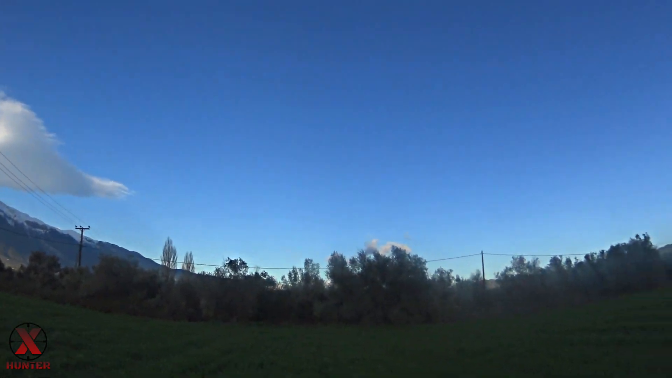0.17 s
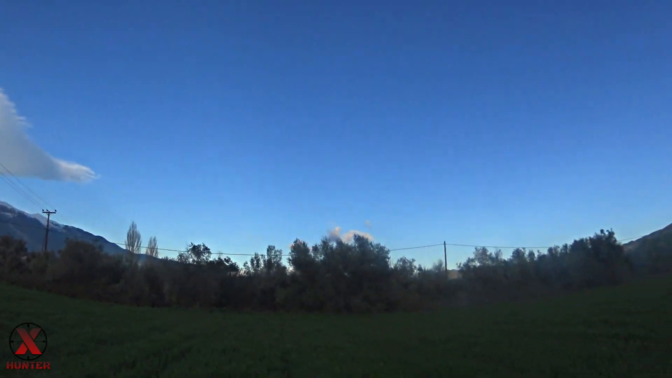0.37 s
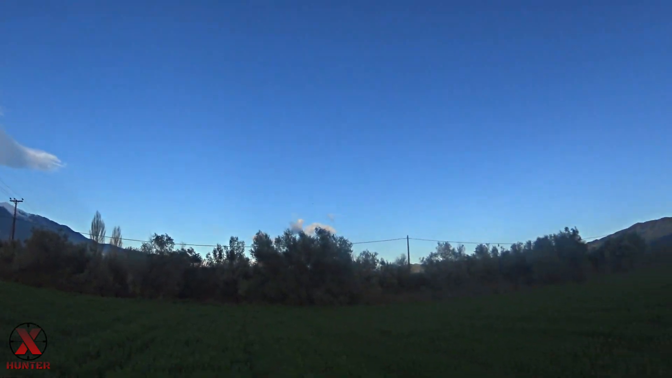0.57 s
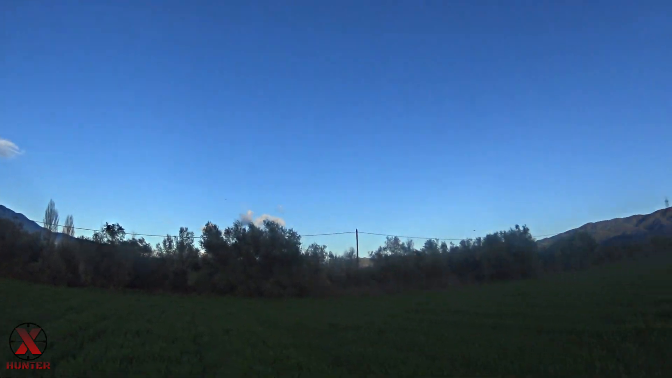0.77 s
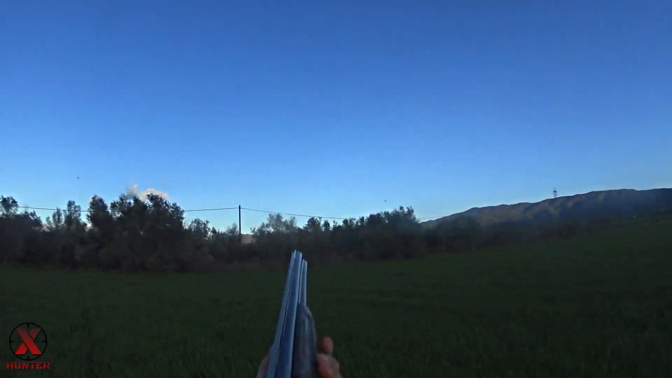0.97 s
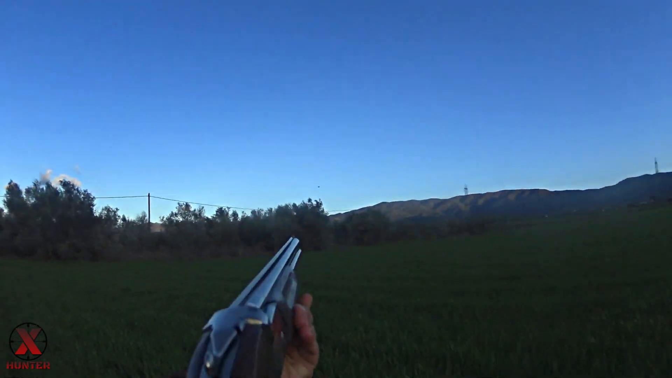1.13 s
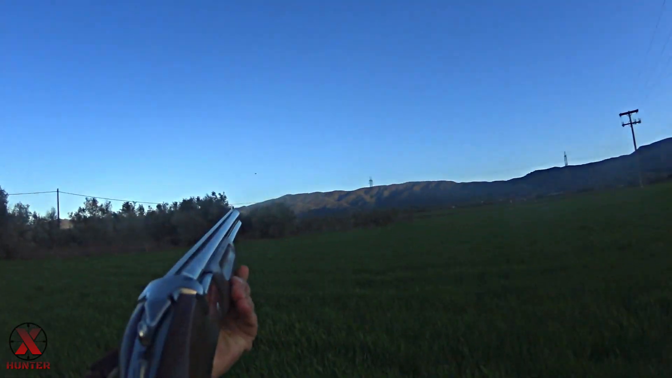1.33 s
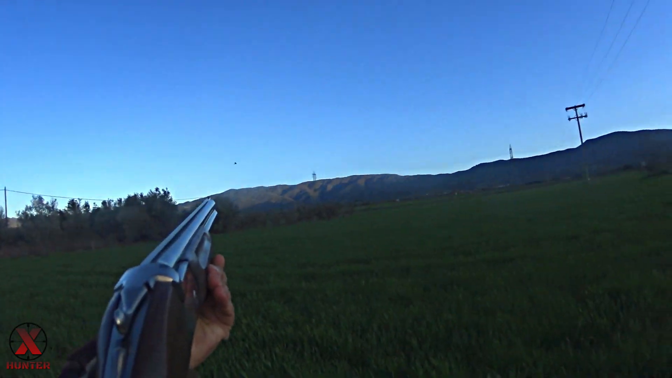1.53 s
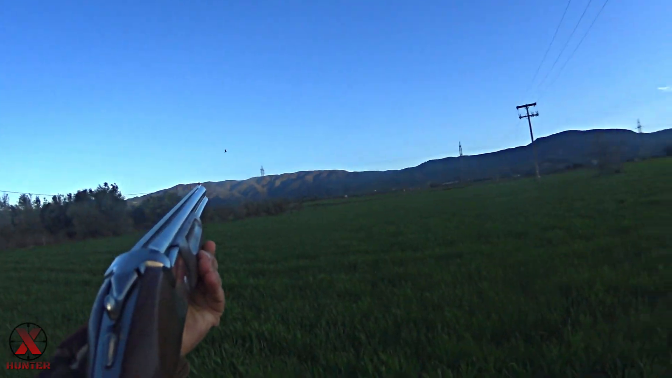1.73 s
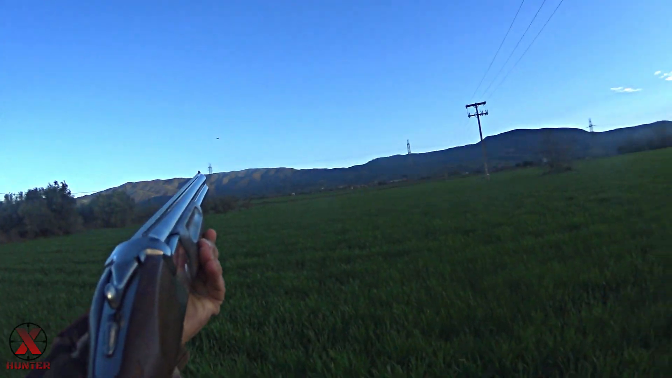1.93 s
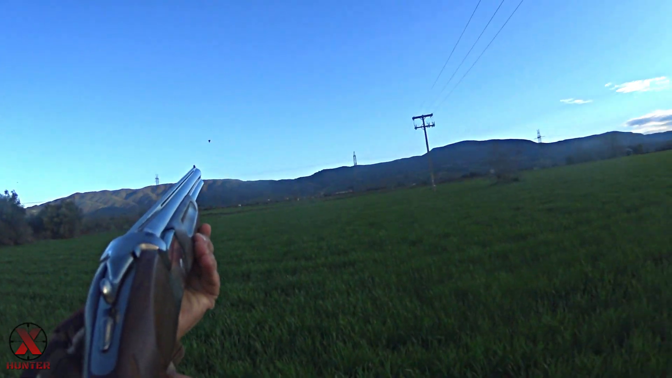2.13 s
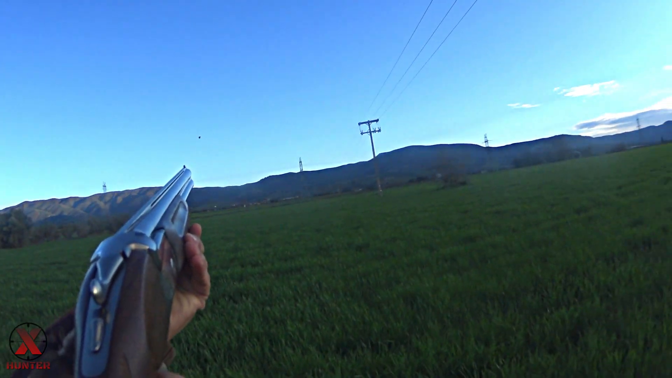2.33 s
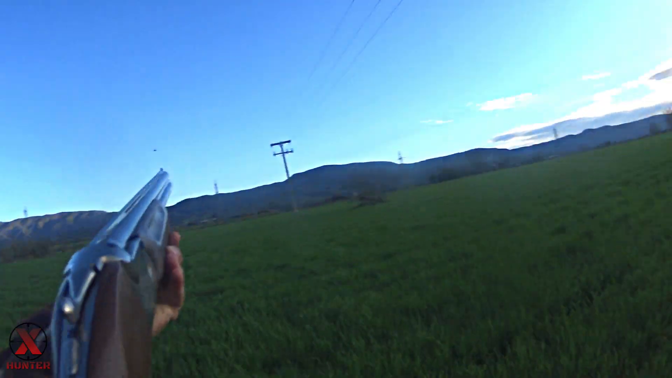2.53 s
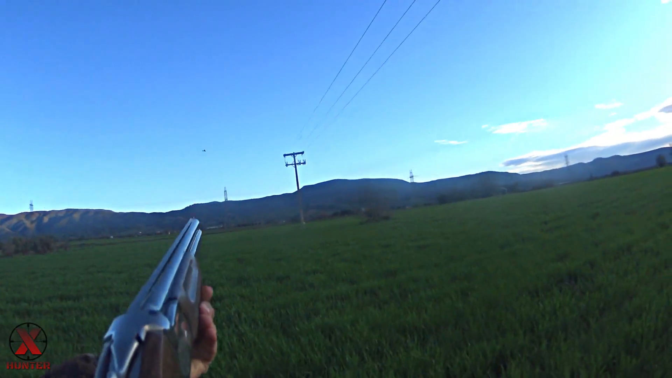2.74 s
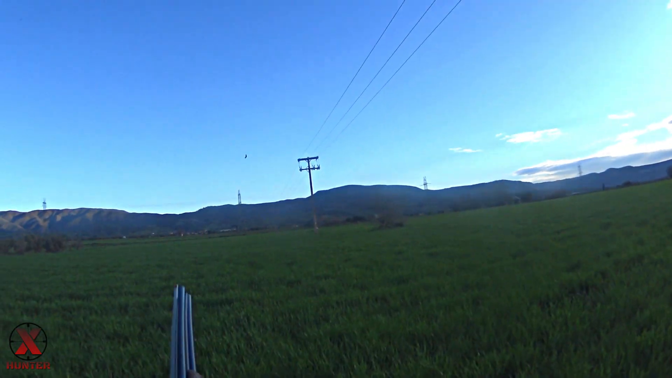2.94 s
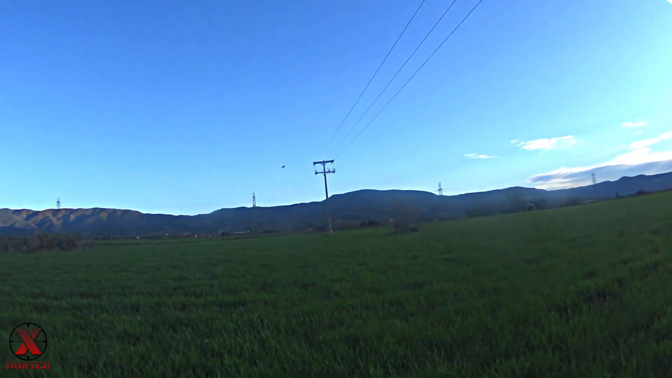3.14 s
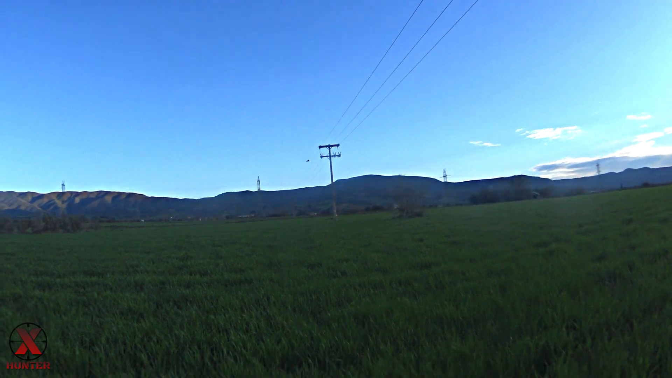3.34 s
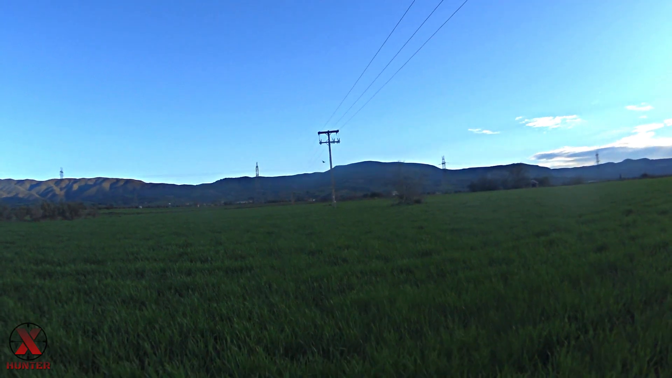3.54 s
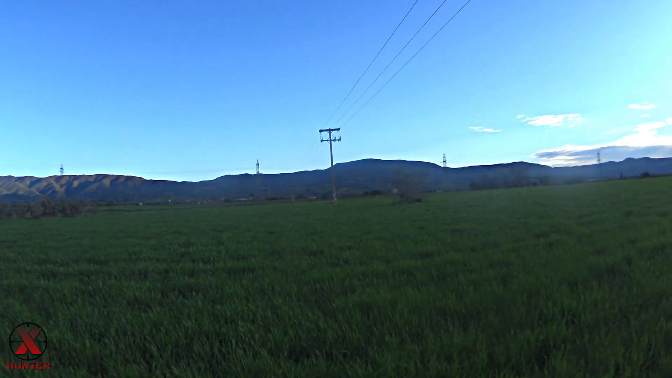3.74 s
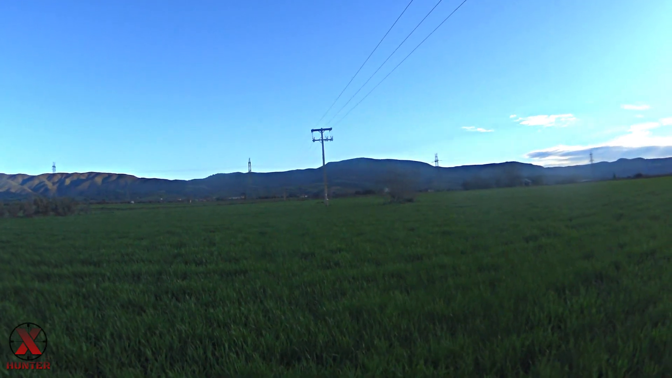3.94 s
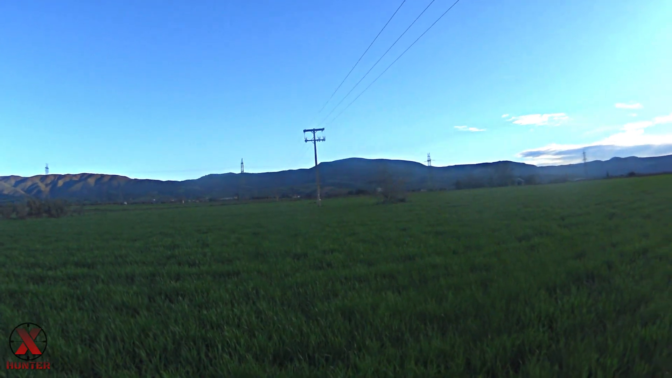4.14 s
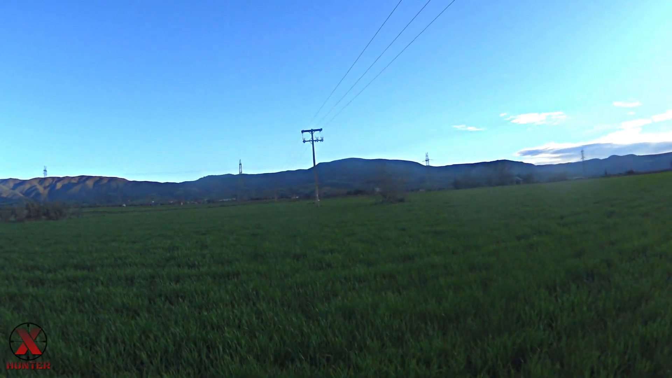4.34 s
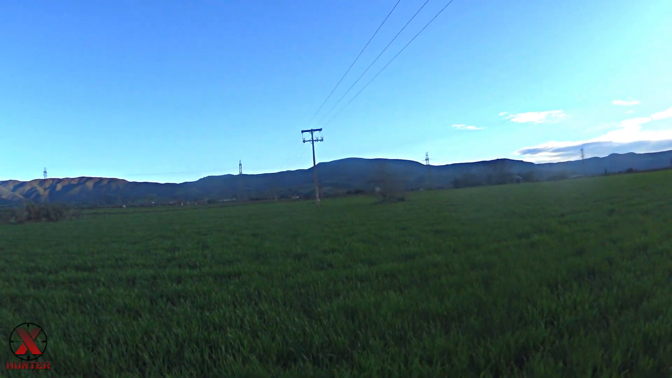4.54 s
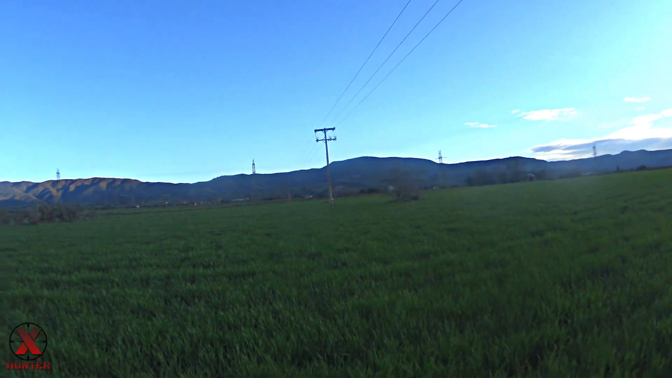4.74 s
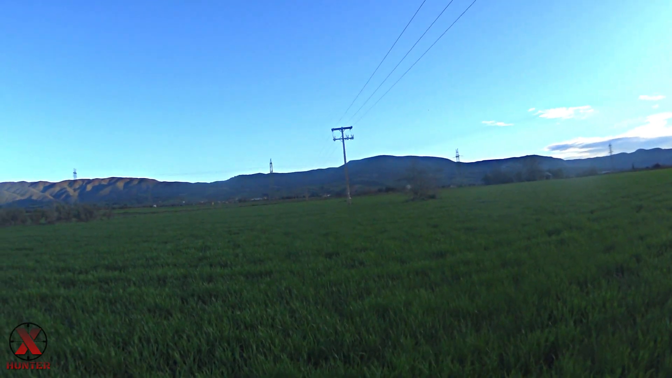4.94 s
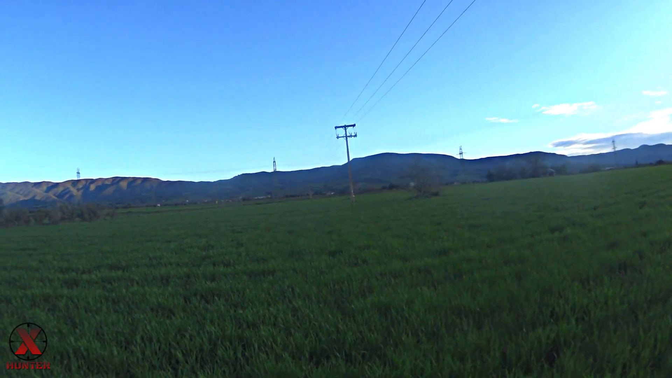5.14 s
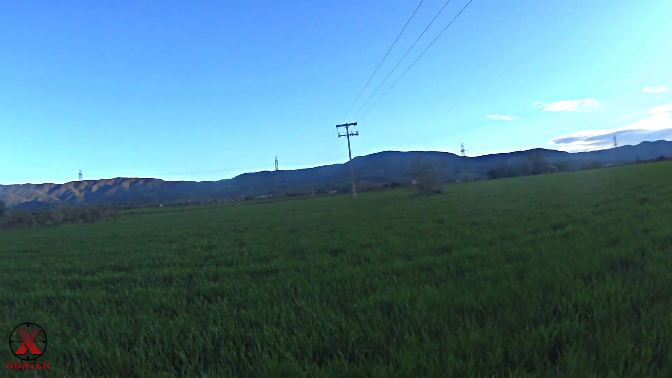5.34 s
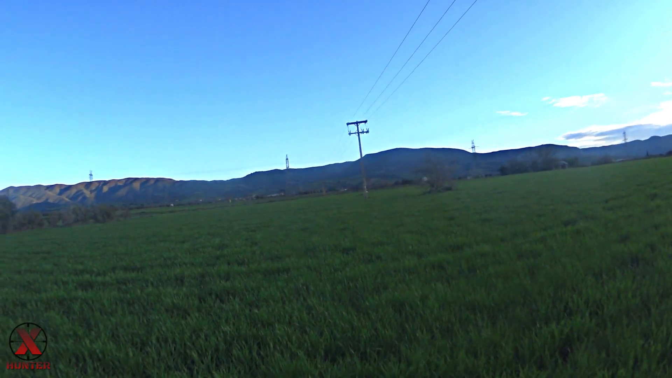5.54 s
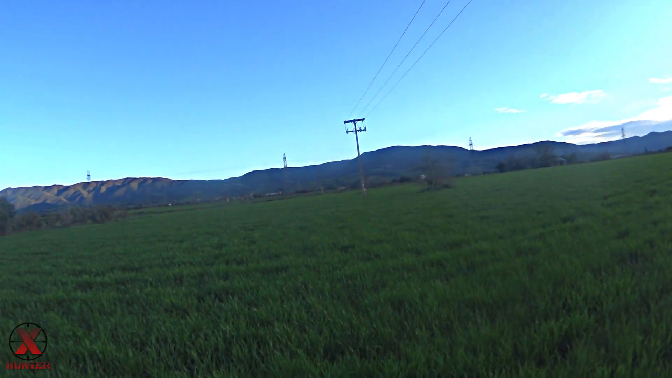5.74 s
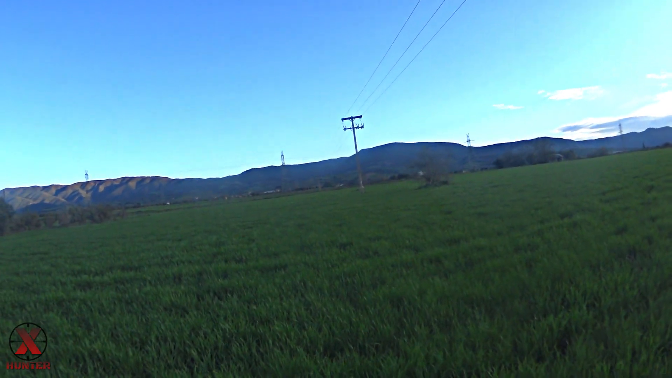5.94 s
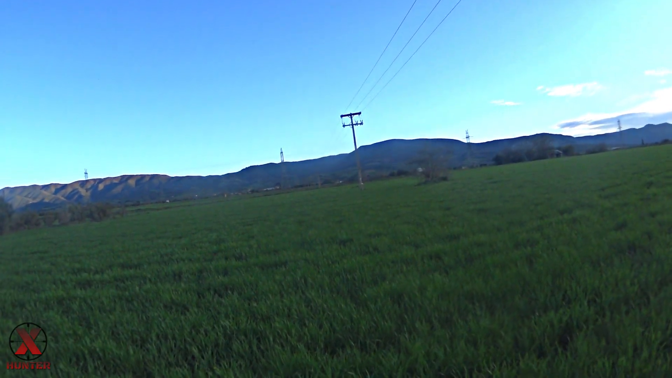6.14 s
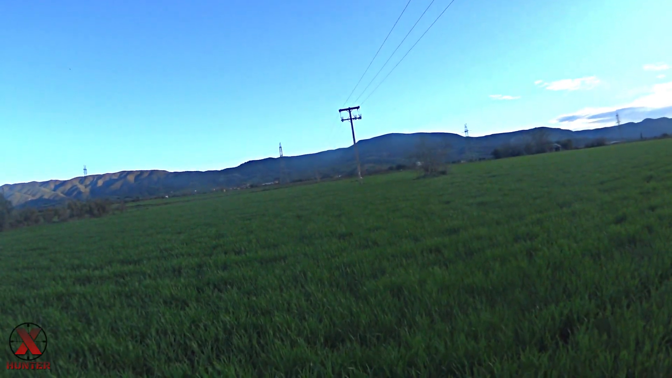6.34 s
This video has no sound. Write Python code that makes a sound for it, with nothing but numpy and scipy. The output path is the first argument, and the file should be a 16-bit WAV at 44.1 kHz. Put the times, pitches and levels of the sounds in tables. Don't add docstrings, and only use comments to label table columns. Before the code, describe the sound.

A body-worn camera in a hard case picks up thin airy wind and soft buffets. After a tick and a sharp stock knock, a single gunshot overloads it: crackling, boxy rattle, held briefly, then a deep downward thump. A snap, two woody-metallic clacks and a faint distant bird whistle follow. Later, strap buckles click rapidly with cloth scuffs, leaving quiet open-air breeze.

```python
import sys
import numpy as np
from scipy import signal
from scipy.fft import rfft, irfft
from scipy.io import wavfile

SR = 44100
rng = np.random.default_rng(int(sys.argv[2]) if len(sys.argv) > 2 else 0)


def makeup_ratio(level_db):
    decades = np.asarray(level_db, float) / 20
    return 10 ** decades


def log_audio(samples):
    frames = np.atleast_2d(samples).T
    limited = np.clip(frames, -1, 1)
    pcm = np.round(limited * 32767).astype(np.int16)
    wavfile.write(sys.argv[1], SR, pcm)


N = 286650
BLAST_S = 2.4225

# [f/Hz, level/dB per Hz]
RATTLE = [(1650, -55), (2800, -8), (4090, -1), (4560, -1), (5290, -2), (5830, 2), (7080, -6.5),
          (9640, -15.5), (11000, -12), (14300, -46), (22000, -120)]
RING = [(210, -57), (350, -11.5), (460, -13.5), (497, -6), (538, -9), (1030, -7.5), (1340, 0.5),
        (2010, -8.5), (2660, 2), (3600, -6.5), (4680, -22), (7920, -120)]
SHAKE = [(10, -23), (32, -6), (60, -10), (130, -11.5), (300, -14), (500, -32)]
SNAP = [(470, -55), (800, -59), (1320, -12), (1740, -48), (1970, -5), (5630, -1), (6720, -16.5),
        (8360, -13), (11000, -14.5), (14300, -58), (22000, -120)]
AIR = [(180, -11), (300, -8.5), (929, -3), (1370, -1.5), (1670, -4), (2100, -0.5), (2630, 2), (4130, -12.5),
       (5930, -22), (11000, -18.5), (14300, -64), (22000, -120)]
BUFFET = [(35, -27), (60, -0.5), (129, 2), (408, -12.5), (500, -9.5), (650, -19), (1100, -120)]
GUST = [(8, -6), (25, 6), (55, -4.5), (90, -47)]
SWISH = [(1470, -12.5), (2500, -2), (4110, -9), (6180, -11), (7350, -15), (10100, -18), (11000, -20),
         (14300, -63), (22000, -120)]
AFTER_RING = RING[:-2] + [(6500, -16.5), (11000, -17.0)]
# [f/Hz, width/Hz, gain/dB]
HOUSING = [(1394, 178, 8.5), (2560, 620, -3.5), (5900, 470, 7)]
RATTLE_CAVITIES = [(6050, 500, -5.0), (4630, 300, -9.0)]
SNAP_CAVITIES = [(2700, 640, 1.1), (6040, 280, 2.6), (7980, 480, 4.7)]
# [f/Hz, likeness from 0 to 1; below 0 counts as 0]
AIR_LIKENESS = [(60, 1), (130, 0.93), (270, 0.85), (580, -0.45), (1220, 0.62), (2600, 0.43), (5520, 0.46),
                (11700, 0.37)]
ROAR_LIKENESS = [(60, 0.71), (130, 0.7), (270, 0.39), (580, 0.25), (1220, 0.94), (2600, 0.51), (5520, 0.89),
                 (11700, 0.52)]
GUST_LIKENESS = [(20, 1.0), (60, 0.95)]
SNAP_LIKENESS = [(900, 1.0), (5000, 0.97)]
# [f/Hz, left over right/dB]
AIR_BALANCE = [(60, -1), (110, -0.5), (190, -3.5), (350, -0.5), (630, -1), (1120, -2.5), (2020, 0),
               (3630, -2.5), (6530, -1.5), (11700, -0.5)]
ROAR_BALANCE = [(60, -2), (110, -1), (190, -13.5), (350, -11.5), (630, 1.5), (1120, -4), (2020, -1.5),
                (3630, -0.5), (6530, 0), (11700, 0.5)]
SNAP_BALANCE = [(900, -0.73), (9000, 0.86)]
# held level/dB, hold/s, fall/dB per s, tail level/dB,
# tail fall/dB per s, sag while held/dB per s
RATTLE_ROAR = (-16.5, 0.15, 143, -23, 52.5, 31)
RING_ROAR = (-25, 0.155, 150, -28, 33, 5)
SHAKE_ROAR = (-37.5, .18, 190, -60, 15, 0)
# [delay/s, lift/dB]
ECHOES = [
    (0.236, 5.7),
    (0.309, 5.8),
]
# [t/s, f/Hz, level/dB]
THUMP = [
    (2.5642, 168, -9.5),
    (2.572, 150, -12.5),
    (2.577, 128, -14.5),
    (2.582, 92, -17.5),
    (2.589, 62, -17),
    (2.598, 50, -20),
    (2.612, 40, -36),
    (2.64, 38, -60),
]
# [t/s, peak level/dB]
CRACKS = [(2.4271, -7), (2.4279, -8), (2.4288, -9), (2.4352, -10), (2.4384, -12), (2.4425, -11),
          (2.4622, -8), (2.4736, -12), (2.4794, -11), (2.4857, -19), (2.4892, -18), (2.502, -7),
          (2.5066, -16), (2.5259, -7), (2.5355, -17), (2.5436, -12), (2.5576, -19), (2.6012, -14),
          (2.6547, -14), (2.665, -20), (2.6961, -16), (2.7354, -26), (2.8034, -28.5), (2.84, -25)]
# [t/s, peak level/dB, main ring f/Hz, upper mode level/dB, contact/ms]
KNOCKS = [(1.117, -36, 2900, -6, 1.4), (2.427, -6, 1270, -15, 2), (2.4348, -7, 1335, -9, 4),
          (2.48, -16.5, 1330, 0, 1.1), (2.511, -10, 1440, -3, 3.3), (2.593, -14, 1600, -3, 3),
          (2.624, -5.5, 1550, 0, 1.6), (3.752, -17, 1340, 3.5, 1.3), (1.1708, -4.5, 1230, 5, 0.38),
          (3.0039, -5.5, 1740, -1, 1.25), (3.0053, -9, 1880, -6, 0.92), (3.189, -23, 1450, -21, 1.1),
          (3.2087, -5.5, 1460, 0, 0.36), (3.21, -8, 1390, 5, 0.93), (3.2495, -14.5, 1530, -1.5, 2.7),
          (3.01, -33, 1350, -7.5, 1.7), (3.2452, -24, 1000, 9, 0.97), (3.0068, -22, 1800, -10, .4),
          (3.212, -16, 1440, 7, 0.46), (3.2165, -26, 1150, -8, 1.2), (1.1738, -19, 1480, -3, 2.9),
          (1.177, -28, 1100, -10, 2.5), (3.1845, -30, 750, -9, 0.9), (2.7185, -18, 980, -2, 2),
          (4.7, -34, 1350, -3, 1.0)]
# [f/Hz, level/dB, time to fall 60 dB/s, lag at the right port/ms]
STOCK = [(702, -6.5, 0.0098, 0.26), (1314, -19.5, 0.026, 0.01), (2480, -1, 0.0059, 0.06),
         (3220, -5, 0.0033, 0.054), (1910, -13.5, 0.015, 0.16), (4540, -15.5, 0.0039, 0.05),
         (6130, -16.5, 0.005, 0.053), (8240, -28, 0.0029, 0.026)]
# [t/s, peak level/dB, f/Hz, left over right/dB, time to fall 60 dB/s]
BUMPS = [(0.779, -44, 244, -4, 0.032), (1.085, -37, 199, 0, 0.027), (2.256, -35, 400, -4, 0.0063),
         (2.427, -18, 458, 1, 0.018), (2.428, -25, 220, 2, 0.028), (2.482, -22.5, 344, 2, 0.016),
         (2.565, -11.5, 259, -13, 0.021), (2.562, -18.5, 644, -3, 0.017), (2.578, -18, 332, -5, 0.026),
         (2.592, -22.5, 511, -8, 0.046), (2.72, -29.5, 406, -5, 0.027), (4.834, -43.5, 295, -2, 0.049),
         (5.146, -30.5, 730, -7, 0.015), (5.145, -34.5, 303, -3, 0.0082), (1.1712, -27, 476, -4, 0.017),
         (3.005, -28.5, 424, -1, 0.0165), (3.209, -29, 463, -5, 0.014), (3.753, -39, 455, -3, 0.013)]
# [t/s, peak level/dB, left over right/dB, time to fall 60 dB/s, treble/dB]
ACTION = [
    (2.4072, -17.5, 3, 0.061, 5),
    (2.4081, -16, 5, .012, 1),
    (2.4213, -7.5, -14, 0.019, 7),
    (2.426, -0.5, 10, 0.015, 13),
    (2.4348, -2.5, -6, 0.037, 8),
    (2.7099, -12, 2, 0.064, -10),
    (2.7176, -0.5, -2.1, 0.0065, -1),
    (2.7452, -15, 6, 0.047, -8),
    (3.4154, -22.5, -1, 0.011, -9),
    (3.4239, -35, 2, 0.010, -14),
]
# [t/s, peak level/dB, after-ring level/dB, time to fall 60 dB/s, treble/dB]
BUCKLE = [(.921, -26, -11, 0.0095, 0), (.928, -32, -7, .016, -2), (4.198, -34.5, 3, 0.02, -12),
          (4.8065, -33, 10, 0.014, 2), (4.8137, -28, 11, 0.007, -4), (4.84, -28, 6, 0.0085, 7),
          (4.867, -27, -2, .006, -3), (4.8875, -28, -5, .008, 8), (5.0615, -13, -4, 0.006, 8),
          (5.119, -32, 0, 0.011, -8), (4.828, -22, 19, 0.021, 8.5), (4.8365, -24, 8, 0.01, 7),
          (4.8545, -9.5, 0, 0.015, 3), (4.8789, -8.5, -1, 0.0099, 5.5), (4.918, -14.5, 8, 0.013, 6),
          (4.9295, -31, -8, 0.017, 11), (4.9503, -9.5, -0.5, 0.0094, 3), (4.9527, -13, 8, 0.0041, -3),
          (4.965, -26.5, -8, 0.086, 2.1), (4.9907, -15, 5, 0.0081, 8.5), (5.008, -21.5, 0, 0.014, 6),
          (5.032, -20.5, -9, 0.051, -11), (5.0448, -17, 3, 0.025, -3), (5.051, -7, -8, 0.013, 3),
          (5.0617, -4.5, -1.5, 0.011, 7.5), (5.1142, -19, 2, 0.016, -3), (5.1382, -16, 2, 0.014, 4.5),
          (5.2978, -31.5, 11, 0.009, -14)]
# [t/s, level/dB, length/s, lowest f/Hz, highest f/Hz]
SCUFFS = [(0.747, -57, 0.011, 5000, 7200), (0.762, -50.5, 0.063, 2960, 6200),
          (0.769, -58, 0.026, 9300, 10300), (0.917, -39, 0.047, 4030, 7960),
          (0.947, -48.5, 0.11, 5030, 6750), (1.077, -44.5, 0.03, 1800, 6960),
          (2.65, -44, 0.021, 3000, 10800), (3.064, -49.5, 0.23, 4870, 11000),
          (3.244, -47, 0.13, 2220, 5800), (4.832, -34, 0.019, 1510, 3770), (5.041, -36, 0.011, 2000, 10900),
          (5.058, -29.5, 0.06, 3600, 9600), (5.144, -45, 0.024, 2500, 6500),
          (5.812, -55.5, 0.078, 3970, 8400)]
# [t/s, air level/dB, extra brightness facing the wind/dB]
BREEZE = [(0.0, -54.5, 3.5), (.3, -53.5, 4), (.76, -53.5, 1.9), (1.1, -48.5, -2.5), (1.3, -52.5, -3),
          (1.7, -55, 1.1), (2.05, -55, 5.5), (2.35, -56.5, 4.5), (2.9, -54.5, 8), (3.19, -49.5, -1.3),
          (3.4, -54.5, 1.5), (3.72, -54.5, 5), (3.95, -55, 7), (4.45, -58.5, -0.5), (5.05, -54, 4),
          (5.5, -58, -0.5), (5.85, -60.5, 4.5), (6.5, -55.5, -4.5)]
# [t/s, buffet level/dB, deep push level/dB, half width/s]
GUSTS = [(.24, -55, -62, 0.17), (.55, -61, -69, 0.032), (.82, -56, -48, 0.095), (1.13, -54.5, -45.5, 0.12),
         (1.45, -61.5, -58, 0.29), (2.3, -62, -59, 0.17), (2.485, -40, -41, 0.033), (3.05, -48, -60, 0.2),
         (3.25, -57.5, -54, 0.17), (3.7, -46.5, -70, 0.16), (4.1, -61, -68, 0.11), (5.12, -61, -57.5, 0.15),
         (6.35, -63, -64, 0.27)]
# [t/s, peak level/dB, rise/s per 10 dB, fall/s per 10 dB]
MOVES = [
    (.97, -50.5, 0.19, 0.21),
    (1.4, -63, 0.16, 0.7),
    (3.0, -55.5, 0.41, 0.86),
    (4.15, -63.5, 0.31, 0.5),
    (5.15, -58, 0.36, 0.12),
    (5.83, -60, 0.45, 3),
]
# [t/s, f/Hz, level/dB]
BIRD = [
    [(3.335, 3820, -70), (3.355, 3720, -57), (3.405, 3950, -61), (3.43, 3880, -59), (3.485, 4030, -63),
     (3.505, 3930, -70)],
    [(3.52, 3900, -75), (3.535, 3870, -59), (3.565, 3810, -61), (3.585, 3640, -59), (3.61, 3600, -62),
     (3.616, 3600, -80), (3.62, 3900, -80), (3.626, 3900, -61), (3.655, 3960, -62), (3.69, 3780, -66)],
]


def shot():
    shudder, crackle = drift(93), drift(35)
    crackles_per_s, crackle_db, dulling_db_per_s = 200, 15, 23
    is_crackle = rng.random(N) < crackles_per_s / SR
    spikes = makeup_ratio(crackle_db + rng.normal(0, 4, N)) * rng.choice([-1, 1], N) * is_crackle
    grit = gritty(2.2) + spikes * [[1], [.3]]
    rattle = coloured(grit, RATTLE, ROAR_LIKENESS, ROAR_BALANCE, RATTLE_CAVITIES)
    late_s = np.clip(np.arange(N) / SR - BLAST_S, 0, .3)
    rattle = rattle + (makeup_ratio(5.0 - dulling_db_per_s * late_s) - 1) * band(rattle, 6660, 14000)
    rattle = roar(*RATTLE_ROAR) * makeup_ratio(1.5 * shudder + 1.0 * crackle) * rattle

    cavity = coloured(gritty(3.0), RING, ROAR_LIKENESS, ROAR_BALANCE)
    cavity = roar(*RING_ROAR) * makeup_ratio(1.0 * shudder + 1.5 * drift(71) + 1.2 * drift(25)) * cavity
    shake = coloured(gritty(0), SHAKE, ROAR_LIKENESS, AIR_BALANCE)
    shake = roar(*SHAKE_ROAR) * makeup_ratio(2.5 * drift(30)) * shake
    thump = glide(THUMP) * makeup_ratio([[-2.5], [2.2]])
    return rattle + cavity + shake + thump


def roar(held_db, hold_s, fall, tail_db, tail_fall, sag):
    t = np.arange(N) / SR - BLAST_S
    swell_s, swell_db, echo_width_s = .03, 2.5, 0.012
    swelling_db = swell_db * np.maximum(1 - t / swell_s, 0)
    body_db = held_db - sag * t - swelling_db - fall * np.maximum(t - hold_s, 0)
    tail_db = tail_db - tail_fall * t
    lift_db = sum(db * hump(BLAST_S + s, echo_width_s) for s, db in ECHOES)
    return (t >= 0) * np.maximum(makeup_ratio(body_db), makeup_ratio(tail_db)) * makeup_ratio(lift_db)


def cracks():
    out, click = np.zeros((2, N)), np.arange(300) == 0
    tick = click + 0.36 * ring(click, 5100, 0.0023) + 0.15 * ring(click, 2570, 0.0056)
    dulling_hz_per_s = 10000
    for k, (s, peak_db) in enumerate(CRACKS):
        dulled = band(tick, 1880, 11500 - dulling_hz_per_s * (s - BLAST_S))
        add(out, s - .0001, (-1) ** k * np.array([dulled, dulled]), peak_db, -1.5)
    return out


def knocks():
    out, t = np.zeros((2, N)), np.arange(2600) / SR
    hard_bright_db, dulling_db_per_ms, low_fade_db_per_khz = -11, 4, 10.5
    for s, peak_db, main_hz, upper_db, contact_ms in KNOCKS:
        touch = rng.standard_normal((3, len(t))) * np.exp(-1000 * t / np.clip(contact_ms, .2, 9))
        touch = .35 * (touch[0] + .7 * touch[1:]) - 3.0 * (t == 0)
        modes = [lagged(makeup_ratio(db) * ring(touch, hz, t60), lag_ms) for hz, db, t60, lag_ms in STOCK]
        low, lasting, upper, edge, middle, *metal = modes
        low_gain = makeup_ratio(-low_fade_db_per_khz * (main_hz / 1000 - 1.23))
        body = ring(touch, main_hz, 0.0094 + 0.0038 * contact_ms) + lasting + middle
        body = body - low * low_gain - makeup_ratio(upper_db) * (upper - edge)
        metal_db = hard_bright_db - dulling_db_per_ms * contact_ms + 11.4 * min(main_hz / 1000, 2)
        metal = makeup_ratio(metal_db) * (metal[0] - metal[1] + metal[2])
        add(out, s + 0.001047, band(body, 250, 3360) + band(metal, 4300, 13000), peak_db, -2.5)
    return out


def bumps():
    out, t = np.zeros((2, N)), np.arange(2600) / SR
    for s, peak_db, hz, pan_db, t60 in BUMPS:
        touch = rng.standard_normal((2, len(t))) * np.exp(-t / 0.0018) + 2.5 * (t == 0)
        add(out, s, ring(ring(touch, hz, t60), hz, t60 / 3), peak_db, pan_db)
    return out


def snaps():
    grit = coloured(gritty(2.06), SNAP, SNAP_LIKENESS, SNAP_BALANCE, SNAP_CAVITIES)
    top = band(grit, 5080, 14800)
    after = coloured(gritty(0.46), AFTER_RING, ROAR_LIKENESS, ROAR_BALANCE)
    out, t = np.zeros((2, N)), np.arange(4000) / SR
    action_ring_db, buckle_pan_db = 3, -0.7
    rows = [(*row, action_ring_db) for row in ACTION]
    rows += [(s, db, buckle_pan_db, t60, top_db, ring_db) for s, db, ring_db, t60, top_db in BUCKLE]
    for s, peak_db, pan_db, t60, top_db, ring_db in rows:
        at, t60 = round(s * SR), np.clip(t60, .004, .2)
        here = slice(at, at + len(t))
        burst = grit[:, here] + (makeup_ratio(top_db) - 1) * top[:, here]
        burst = burst * makeup_ratio(-60 * t / t60) * (1 - np.exp(-t / 0.00014))
        answer = makeup_ratio(ring_db - 16.0 - 60 * t / (4.57 * t60)) * (1 - np.exp(-t / 0.0021))
        burst += after[:, here] * answer
        add(out, s + .0008, band(burst, 920, 11600), peak_db - 3.5, pan_db)
    return out


def scuffs():
    out, grit = np.zeros((2, N)), gritty(3.0)
    grit = np.array([grit[0] + 0.2 * grit[1], grit[0] - 0.069 * grit[1]])
    for s, level_db, length, low_hz, high_hz in SCUFFS:
        at, size = round(s * SR), round(length * SR)
        swell = np.sin(np.pi * np.linspace(0, 1, size) ** 0.34)
        drag = rms_one(band(grit[:, at:at + size], low_hz, high_hz))
        out[:, at:at + size] += makeup_ratio(level_db) * swell * drag
    return out


def rustle():
    t = np.arange(N) / SR
    moving = makeup_ratio(-69)
    for s, db, rise, fall in MOVES:
        moving = moving + makeup_ratio(db - 10 * np.maximum((s - t) / rise, (t - s) / fall))
    swish = coloured(gritty(1.5), SWISH, AIR_LIKENESS, ROAR_BALANCE)
    return moving * makeup_ratio(2.5 + 0.85 * drift(45)) * swish


def gusts():
    calm_buffet_db, calm_push_db = -62.5, -67
    buffet = makeup_ratio(calm_buffet_db) + sum(makeup_ratio(db) * hump(s, width) for s, db, _, width in GUSTS)
    push = makeup_ratio(calm_push_db) + sum(makeup_ratio(db) * hump(s, width) for s, _, db, width in GUSTS)
    wind = coloured(gritty(0), BUFFET, AIR_LIKENESS, AIR_BALANCE)
    deep = coloured(gritty(0), GUST, GUST_LIKENESS, AIR_BALANCE)
    wind = buffet * makeup_ratio(-0.5 + 1.73 * drift(26) + 1.8 * drift(4.5)) * wind
    return wind + push * makeup_ratio(2.5 * drift(5)) * deep


def breeze():
    air_db, facing_db = in_time([BREEZE])
    air = coloured(gritty(0), AIR, AIR_LIKENESS, AIR_BALANCE, HOUSING)
    low = makeup_ratio(air_db + 5.0 + 1.08 * drift(11.6)) * band(air, 204, 2344)
    high = makeup_ratio(air_db + facing_db + 4.0 + 2.0 * drift(12.5)) * band(air, 1740, 10030)
    return low + high


def bird():
    return sum(glide(call) for call in BIRD) * makeup_ratio(1.2 * drift(30) + 1.5)


def rms_one(x):
    return x / np.sqrt(np.mean(x ** 2) + 1e-20)


def in_time(spans):
    s, *columns = np.concatenate(spans).T
    return [np.interp(np.arange(N) / SR, s, c, left=-150, right=-150) for c in columns]


def at_hz(points, hz):
    return np.interp(np.log(hz), np.log(np.array(points)[:, 0]), np.array(points)[:, 1])


def drift(rate):
    r = np.exp(-80 * np.pi * rate / SR)
    slow = signal.lfilter([1], [1, -2 * r, r * r], rng.standard_normal(N // 40 + 2002))[2000:]
    return np.interp(np.arange(N) / 40, np.arange(len(slow)), rms_one(slow))


def gritty(grit_db):
    return rng.standard_normal((2, N)) * makeup_ratio(grit_db * np.minimum(rng.exponential(1, N), 4))


def coloured(pair, spectrum, likeness, balance, cavities=()):
    hz = np.maximum(np.arange(N // 2 + 1) * SR / N, 1)
    gain = makeup_ratio(at_hz(spectrum, hz))
    for centre_hz, width_hz, gain_db in cavities:
        gain = gain * (1 + makeup_ratio(gain_db) / (1 + (2 * (hz - centre_hz) / width_hz) ** 2))
    alike = np.clip(at_hz(likeness, hz), 0, .99)
    lean = makeup_ratio(at_hz(balance, hz) / 2)
    mid, side = rfft(pair) * gain * np.sqrt([1 + alike, 1 - alike])
    out = irfft(np.array([(mid + side) * lean, (mid - side) / lean]), N)
    return out / np.std(out.mean(0))


def ring(x, hz, t60):
    r, w = makeup_ratio(-60 / (t60 * SR)), 2 * np.pi * hz / SR
    return signal.lfilter([0, np.sin(w)], [1, -2 * r * np.cos(w), r * r], x)


def lagged(x, lag_ms):
    n = np.arange(x.shape[1])
    return np.array([x[0], np.interp(n - lag_ms * SR / 1000, n, x[1], left=0)])


def glide(rows):
    hz, level_db = in_time([rows])
    return makeup_ratio(level_db) * np.sin(2 * np.pi * np.cumsum(np.maximum(hz, 0)) / SR)


def hump(s, half_width):
    return np.exp(-((np.arange(N) / SR - s) / max(half_width, .005)) ** 2)


def band(x, low_hz, high_hz):
    sos = signal.butter(3, [low_hz, min(high_hz, 14000)], "band", fs=SR, output="sos")
    return signal.sosfilt(sos, x)


def add(out, s, sound, peak_db, pan_db):
    at = round(s * SR)
    gain = makeup_ratio(peak_db + np.array([[.5], [-.5]]) * pan_db)
    out[:, at:at + sound.shape[1]] += sound / np.abs(sound).max() * gain


def scene():
    gun = shot() + cracks() + knocks() + bumps() + snaps()
    return gun + scuffs() + rustle() + gusts() + breeze() + bird()


def top_cut(x):
    return signal.sosfilt(signal.butter(12, 12330, fs=SR, output="sos"), x)


def record(dry):
    rounded = .95 * np.tanh(dry / .95)
    mix = signal.sosfilt(signal.cheby1(14, .5, 11000, fs=SR, output="sos"), rounded)
    return top_cut(mix)


dry = scene()
out = record(dry)
log_audio(out)
```